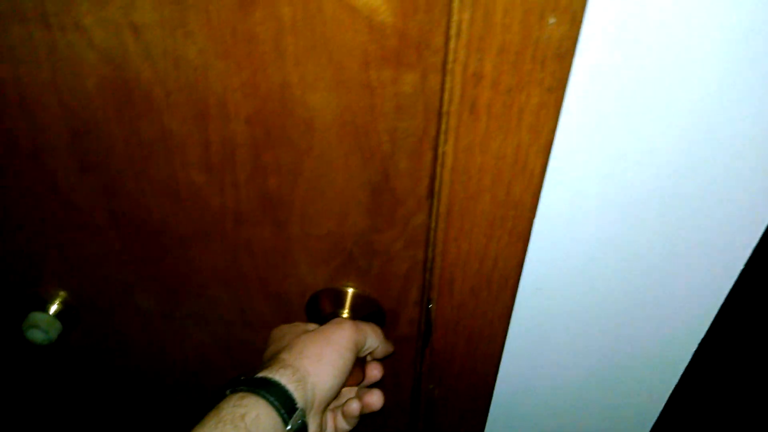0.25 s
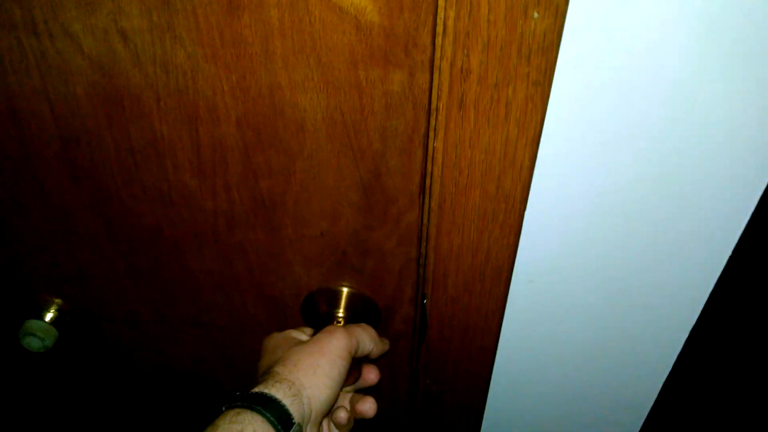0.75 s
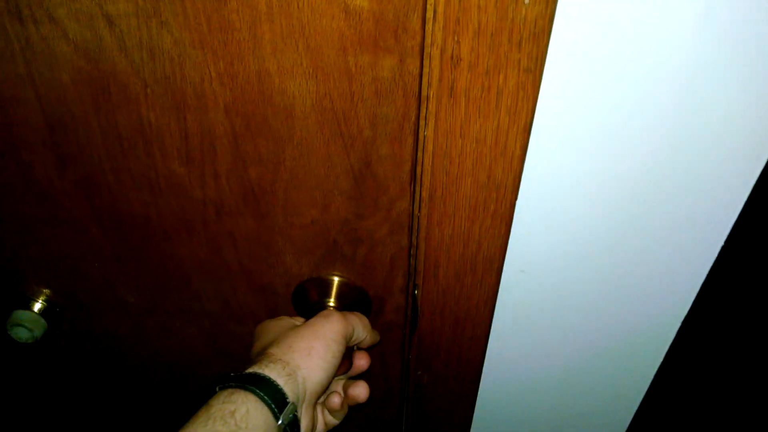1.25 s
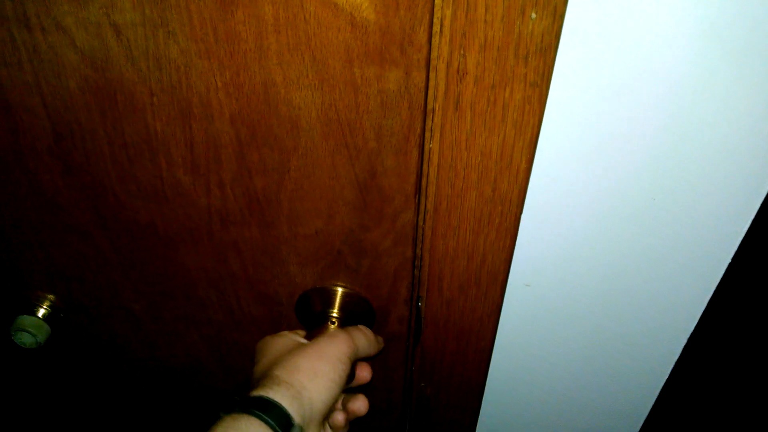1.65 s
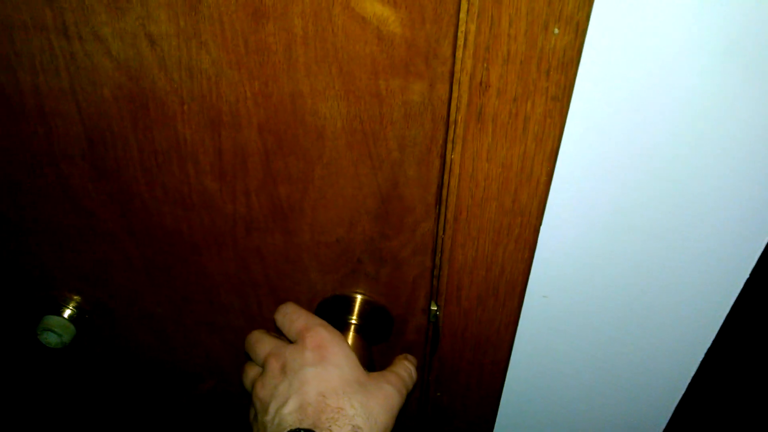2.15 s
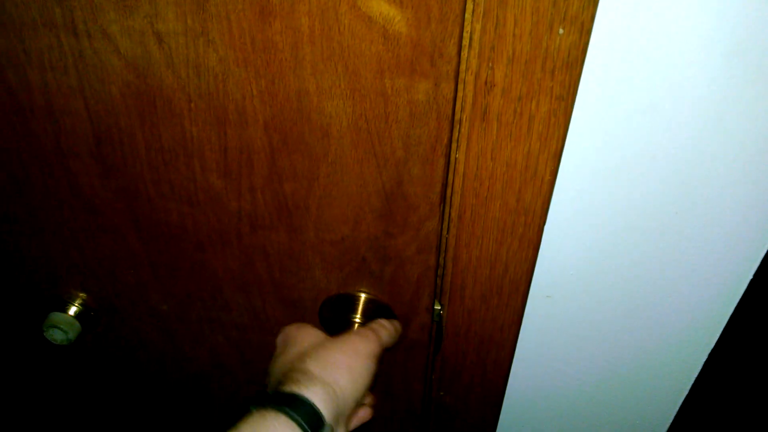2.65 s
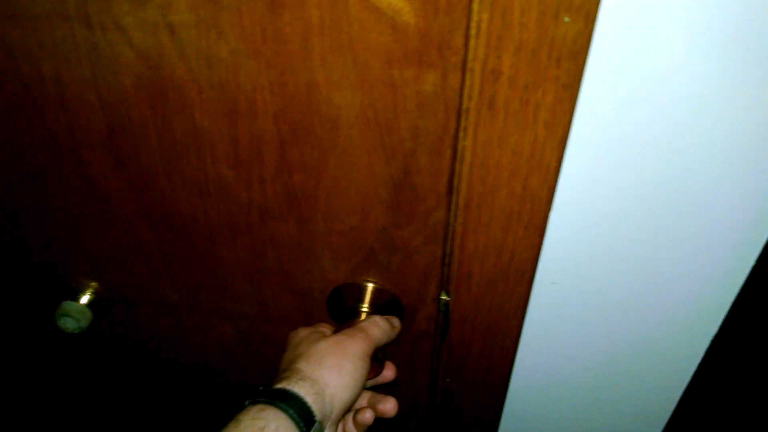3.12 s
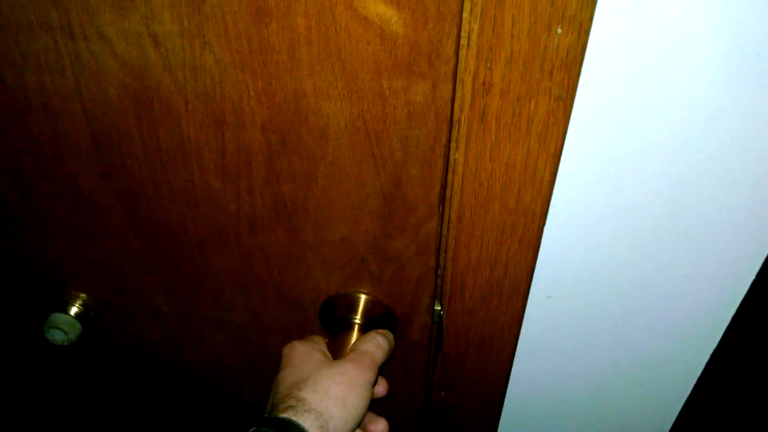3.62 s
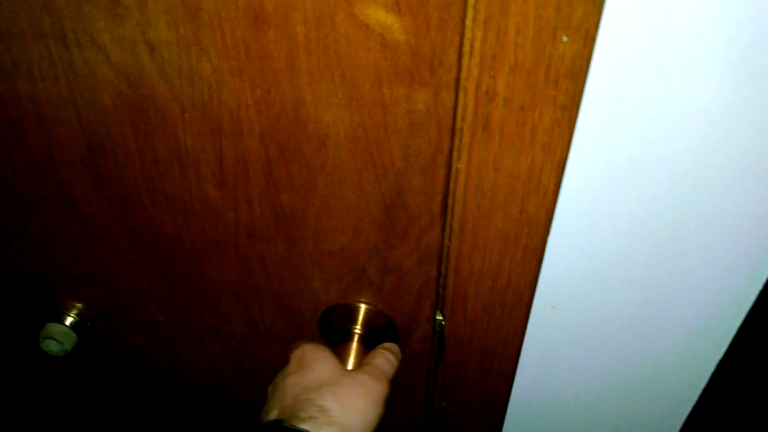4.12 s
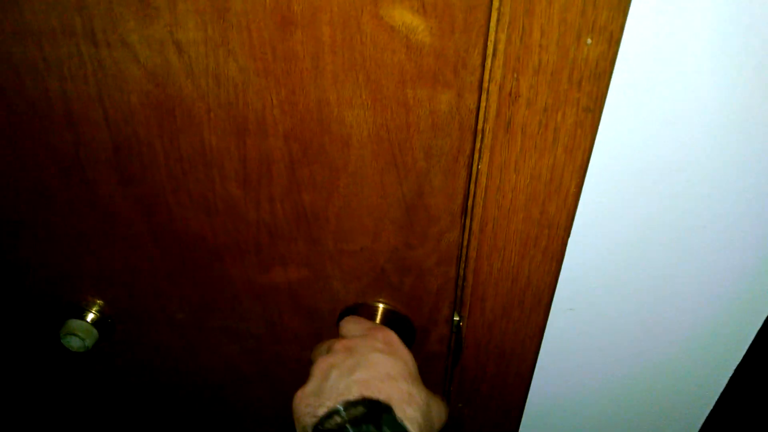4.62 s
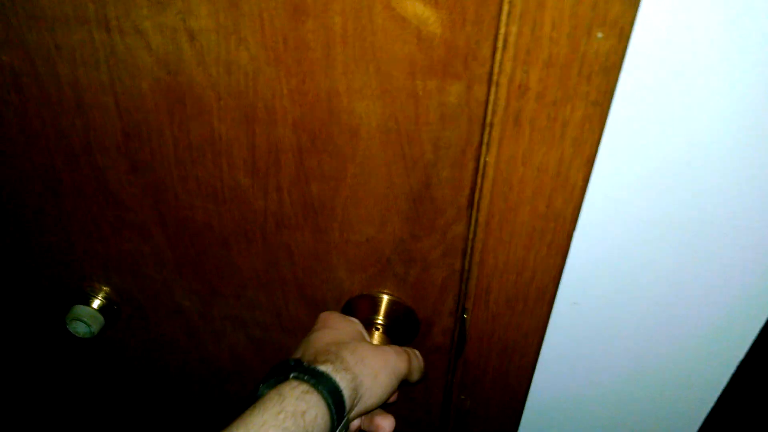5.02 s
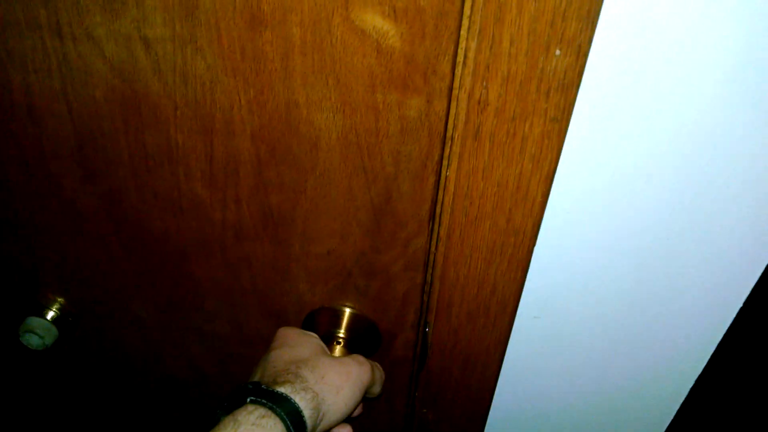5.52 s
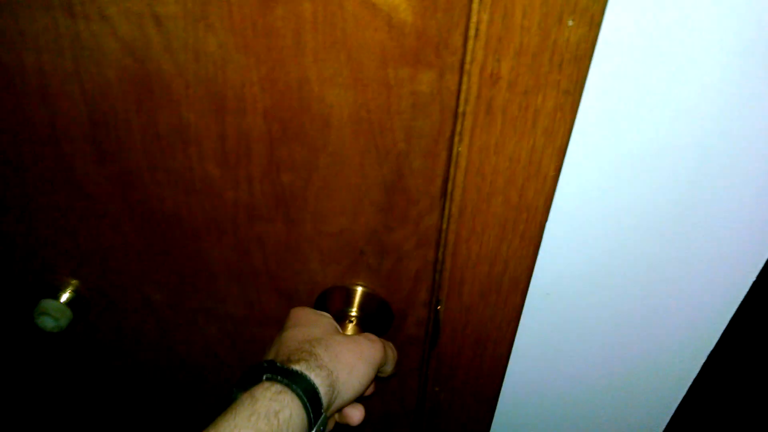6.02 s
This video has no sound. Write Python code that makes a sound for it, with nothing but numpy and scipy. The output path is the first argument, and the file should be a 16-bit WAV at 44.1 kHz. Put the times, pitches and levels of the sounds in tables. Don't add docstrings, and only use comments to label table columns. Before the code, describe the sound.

Throughout, a faint low building murmur, thin microphone hiss and soft handling rumble sit behind a close brass doorknob in a small room. At about 0.25-0.3 s the latch clicks with a springy rattle and a soft wooden bump. A light click follows at 0.8 s and a duller clack and thud at 1.3 s. At 1.9 s the bolt slams bright and sharp. After a quiet gap, the loudest metallic slam lands at 3.1 s with a short ring. From 3.5 to 3.8 s come firm knocks and snaps; from 4.1 to 4.9 s clicks, spring twangs and loose spindle chatter crowd together, with a tiny high ping near 4.5 s and another slam at 4.86 s. Then it is quieter, until a low jerk thumps door and lock at 5.5 s and a harder one hits at 6.12 s, with an immediate dull rebound and deep wooden thud.

```python
import sys
import numpy as np
from scipy import signal
from scipy.fft import rfft, irfft, next_fast_len
from scipy.io import wavfile
from scipy.ndimage import uniform_filter1d, map_coordinates

SR = 44100
rng = np.random.default_rng(int(sys.argv[2]) if len(sys.argv) > 2 else 0)


def bounce(signal):
    frames = np.transpose(np.atleast_2d(signal))
    limited = np.clip(frames, -1, 1)
    pcm = np.round(limited * 32767).astype(np.int16)
    wavfile.write(sys.argv[1], SR, pcm)


def voltage_ratio(decibels):
    exponent = np.asarray(decibels, float) / 20
    return 10 ** exponent


N = 276506
SPAN = 16384
LEAD = 300


def unit(x):
    return x / np.sqrt(np.mean(x ** 2) + 1e-20)


def along(points, hz):
    f, v = np.transpose(points)
    return np.interp(np.log(hz + 1), np.log(f + 1), v)


def wobble(rate_hz):
    return map_coordinates(rng.standard_normal(int(N * rate_hz / SR) + 4), [np.arange(N) * rate_hz / SR])


def filtered(x, response):
    m = next_fast_len(N + SR // 2)
    return irfft(rfft(x, m) * response(np.fft.rfftfreq(m, 1 / SR)), m)[..., :N]


def noise_pair(response):
    return filtered(rng.standard_normal((2, N)), response)


def jolts(rise_s, fall_s, gain_db):
    ages_s = np.clip(np.arange(N) / SR - np.array(THUDS)[:, :1], 0, None)
    sizes = [voltage_ratio(db + full_db + gain_db) for s, db, ring_hz, full_db in THUDS]
    return sizes @ ((1 - np.exp(-ages_s / rise_s)) * np.exp(-ages_s / fall_s))


# (time [s], effort [dB])
EFFORT = [(0.0, -1.5), (0.21, -1.5), (0.3, 1.5), (0.5, -4), (1.2, -4.5), (1.32, 2.5), (1.5, -2),
          (1.83, -2.5), (1.92, 10), (2.12, -1.5), (2.7, -2.4), (3.14, 2), (3.3, -0.9), (4.07, -0.5),
          (4.19, 3), (4.31, 1), (4.9, 2), (5.08, -2.5)]
# (frequency [Hz], density [dB per Hz])
MURMUR = [(60, -29), (110, -7.5), (160, 3), (300, -5.5), (550, -14), (800, -23.5), (1300, -29.5),
          (4000, -39.5)]
# (frequency [Hz], correlation [-1..1])
MURMUR_ALIKE = [(100, 1), (500, 0.9), (1500, 0.067)]
# (frequency [Hz], density [dB per Hz])
SWAY = [(12, 2.5), (30, 6), (45, 13), (70, -59)]
# (frequency [Hz], density [dB per Hz])
RUMBLE = [(35, -18), (55, -0.5), (78, 6.5), (105, -8.5), (200, -71)]


def house():
    effort_db = np.interp(np.arange(N) / SR, *np.transpose(EFFORT))

    def turn(hz):
        return np.arccos(np.clip(along(MURMUR_ALIKE, hz), -1, 1)) / 2

    a, b = noise_pair(lambda hz: voltage_ratio(along(MURMUR, hz)) * [np.cos(turn(hz)), np.sin(turn(hz))])
    murmur = voltage_ratio(-45 + effort_db + 0.7 * wobble(9.1)) * unit(np.array([a + b, a - b]))

    c, d = noise_pair(lambda hz: voltage_ratio(along(SWAY, hz)))
    swing = voltage_ratio(-52.5 + 1.3 * effort_db)
    swing = swing + jolts(rise_s=0.029, fall_s=0.071, gain_db=-0.5)
    sway = swing * voltage_ratio(2.6 * wobble(6)) * unit(np.array([0.68 * c + 0.16 * d, c - 0.1 * d]))

    e, g = noise_pair(lambda hz: voltage_ratio(along(RUMBLE, hz)))
    shake = voltage_ratio(-44.5) + jolts(rise_s=0.0083, fall_s=0.051, gain_db=4)
    rumble = shake * voltage_ratio(2.2 * wobble(7.6)) * unit(np.array([e + 0.16 * g, e - 0.2 * g]))
    return murmur + sway + rumble


# (time [s], level [dB], length [s], centre [Hz], width [Hz])
TICKS = [
    (0.071, 16.5, 0.0025, 7950, 6000),
    (.765, 9, .012, 12900, 3000),
    (.85, 0, 0.0079, 11900, 4000),
    (1.43, 0, 0.039, 14200, 900),
    (1.772, 9.5, 0.0095, 11000, 5000),
    (2.018, 10, 0.025, 13000, 1500),
    (2.77, 4, 0.0089, 12000, 4000),
    (3.43, 8, .05, 14200, 900),
    (5.77, 7, 0.014, 11900, 5000),
    (5.87, 2, 0.02, 13500, 1500),
]
# (frequency [Hz], density [dB per Hz])
HISS_LEFT = [(300, -20), (1500, 5), (4000, 2), (8000, -3), (12000, 2.5), (15300, 6), (15700, -34)]
# (frequency [Hz], density [dB per Hz])
HISS_RIGHT = [(300, 25), (1500, -0.5), (4000, -2), (8000, -16), (12000, -4.5), (14000, 5), (15300, 4.5),
              (15700, -26)]


def hiss():
    hz, t, z = signal.stft(rng.standard_normal((2, N)), SR, nperseg=256)
    gain = 1
    for s, db, length_s, mid_hz, wide_hz in TICKS:
        distance = ((t - s) / length_s) ** 2 + ((hz[:, None] - mid_hz) / wide_hz) ** 2
        gain = gain + voltage_ratio(db) * np.exp(-distance)
    noise = signal.istft(z * gain, SR, nperseg=256)[1][:, :N]
    return voltage_ratio(-63.5) * filtered(noise, lambda f: voltage_ratio([along(HISS_LEFT, f), along(HISS_RIGHT, f)]))


def modes(table, hz):
    luck_db = 1.5 * rng.standard_normal(len(table))
    z = 0
    for k, (centre_hz, width_hz, db) in enumerate(table):
        damping = 1j * hz * width_hz
        z = z + (-1) ** k * voltage_ratio(db + luck_db[k]) * damping / (centre_hz ** 2 - hz ** 2 + damping)
    return z / np.abs(irfft(z)).max()


def rattle(lasting_s, per_s, spread_db):
    t = np.arange(SPAN // 4) / SR
    when, size = rng.random(len(t)), rng.standard_normal(len(t))
    level_db = spread_db * np.abs(size) - 8.5 - 20 * t / lasting_s
    blows = (when < per_s / SR) * np.sign(size) * voltage_ratio(level_db)
    blows[0] = 1
    return np.pad(blows, (LEAD, 0))


# (frequency [Hz], t60 [s])
ROOM = [(100, 0.4), (260, 0.3), (700, 0.22), (1840, 0.27), (4850, 0.2), (12800, 0.13)]
# (frequency [Hz], level [dB])
WET = [(150, -2.5), (500, 2.5), (1500, -0.5), (2700, -12), (4000, -6), (6000, -1), (12000, -3)]
# (frequency [Hz], level [dB])
SHADOW = [(100, 0), (700, 0), (2000, -4), (5000, -4), (8000, -8), (14000, -14)]


def heard(bodies, blows, starts_s, wet_db, apart):
    half = SPAN // 2
    hz, t, z = signal.stft(rng.standard_normal((len(starts_s), 2, half)), SR, nperseg=256)
    decay = voltage_ratio(-60 * t / along(ROOM, hz)[:, None])
    tail = signal.istft(z * decay, SR, nperseg=256)[1][..., :half]
    tail *= 1 - np.exp(-np.arange(half) / (.003 * SR))
    tail = np.pad(tail / np.linalg.norm(tail, axis=2, keepdims=True), [(0, 0), (0, 0), (LEAD, 0)])

    f = np.fft.rfftfreq(SPAN, 1 / SR)
    a, b = np.moveaxis(rfft(tail, SPAN), 1, 0)
    turn = np.clip(apart(f), 0, 1) * np.pi / 4
    shared, differing = np.cos(turn) * a, np.sin(turn) * b
    wet = voltage_ratio(wet_db + along(WET, f)) * np.array([shared + differing, shared - differing])
    energy = np.linalg.norm(blows, axis=1, keepdims=True)
    shadow = np.array([voltage_ratio(along(SHADOW, f)), f ** 0])[:, None]
    pairs = irfft((rfft(blows, SPAN) + energy * wet) * bodies * shadow, SPAN)

    out = np.zeros((2, N + SPAN + LEAD))
    for k, s in enumerate(starts_s):
        out[:, round(s * SR):][:, :SPAN] += pairs[:, k]
    return out[:, LEAD:N + LEAD]


def contacts(rows, sizzle_db, rattle_s):
    return [(*row, sizzle_db, rattle_s) for row in rows]


# (time [s], level [dB], latch ring [Hz], brightness [dB])
SNAPS = [(0.222, -34, 860, -31), (0.298, -20.5, 1280, -38), (0.827, -34, 1220, -18),
         (1.227, -37.5, 1250, -31), (1.336, -31, 1250, -33), (1.9115, -27, 1120, -3),
         (1.927, -22.5, 1100, -20), (3.048, -30, 1450, -30), (3.56, -32.5, 1240, 3.5),
         (3.709, -35, 1450, -7), (3.74, -18, 1610, -1.5), (3.812, -16.5, 1100, -8),
         (4.196, -17.5, 1190, -1), (4.252, -23.5, 1330, -5), (4.259, -35, 1410, -31),
         (4.496, -21.5, 1030, 5.5), (4.564, -38, 1920, 13)]


def snaps():
    return contacts(SNAPS, sizzle_db=-0.5, rattle_s=0.016)


# (centre [Hz], width [Hz], level [dB])
LATCH = [(613, 840, -7), (1030, 315, -0.5), (1296, 567, -1.5), (1810, 527, 2), (2490, 600, 0.5)]
# (centre [Hz], width [Hz], level [dB])
BRASS = [(2600, 300, 12.5), (3450, 1530, 0), (4000, 1300, -11), (5000, 720, -10.5)]
# (centre [Hz], width [Hz], level [dB])
SIZZLE = [(6000, 1400, -15), (6900, 11000, -45), (9870, 4300, -0.5), (12160, 1250, 8.5), (14200, 6900, 2)]


def knob():
    f = np.fft.rfftfreq(SPAN, 1 / SR)

    def dull(edge_hz):
        return 1 / (1 + 1.4j * f / edge_hz - (f / edge_hz) ** 2)

    hits = sorted(snaps() + twangs() + knocks() + chatters() + clacks() + jerks())
    bodies, blows = [], []
    for s, db, ring_hz, bright_db, sizzle_db, rattle_s in hits:
        ring = 1 + 0.75 * 400j * f / (ring_hz ** 2 - f * f + 400j * f)
        plate = modes(LATCH, f) * dull(edge_hz=1950) * ring
        brass = voltage_ratio(bright_db) * modes(BRASS, f) * dull(edge_hz=5520) ** 2
        spring = voltage_ratio(bright_db + sizzle_db) * modes(SIZZLE, f)
        bodies.append(voltage_ratio(db - 3.5) * (1.118 * plate + brass + spring))
        blows.append(rattle(rattle_s, per_s=900, spread_db=5.5))
    starts_s = [hit[0] + .0004 for hit in hits]
    return heard(np.array(bodies), np.array(blows), starts_s, wet_db=0.5, apart=lambda hz: 0.58 + hz / 4000)


# (time [s], level [dB], leaf ring [Hz], fullness under 250 Hz [dB])
THUDS = [(0.255, -32, 582, -12), (0.297, -36.5, 483, -9), (0.83, -35.5, 540, -15), (1.226, -39.5, 357, -20),
         (1.271, -23.5, 260, -9), (1.335, -33, 525, -10), (1.895, -22.5, 424, -18), (3.008, -33, 383, -22),
         (3.111, -26.5, 492, -15.5), (3.371, -38, 240, -3.5), (3.525, -30, 254, -7.5),
         (3.559, -38.5, 500, -8), (3.716, -33, 370, -18), (3.81, -44.5, 524, 1), (3.988, -38.5, 493, -4.5),
         (4.084, -36.5, 560, -14), (4.132, -26, 268, -4), (4.194, -33, 248, -23), (4.313, -30, 544, -35),
         (4.495, -29.5, 505, -19), (4.595, -29.5, 480, -12), (4.804, -35, 420, -13),
         (4.855, -25.5, 475, -28), (5.179, -38, 336, -10.5), (5.499, -24, 393, -5), (5.782, -43, 300, -4),
         (6.075, -33.5, 245, -12), (6.124, -19, 198, -4.5), (6.152, -33.5, 250, -22)]
# (centre [Hz], width [Hz], level [dB])
LEAF = [(150.2, 18.6, 3.5), (230, 38, -5.5), (336, 65, 5), (422, 78, -2), (525, 28.7, -0.5),
        (637, 88, -1.5), (682, 515, -9)]


def door():
    f = np.fft.rfftfreq(SPAN, 1 / SR)
    bodies, blows = [], []
    for s, db, ring_hz, full_db in THUDS:
        full = voltage_ratio(full_db + 9.5) * modes(LEAF[:2], f)
        leaf = full + modes(LEAF[2:] + [(ring_hz, 50, 2)], f)
        bodies.append(voltage_ratio(db) * leaf / (1 + 1j * f / 1200))
        blows.append(rattle(0.042, per_s=230, spread_db=3.5))
    starts_s = [row[0] + .001 for row in THUDS]
    return heard(np.array(bodies), np.array(blows), starts_s, wet_db=-1, apart=lambda hz: .08 + hz / 3000)


# (time [s], level [dB], latch ring [Hz], brightness [dB])
TWANGS = [(0.2555, -26, 1435, -22), (0.265, -32, 1240, -11.5), (1.271, -20.5, 1120, -25),
          (1.901, -17, 1080, -11), (3.092, -52, 1180, 7), (3.342, -48, 1460, -15), (3.5, -30, 840, -8),
          (4.169, -24, 1260, -21), (4.294, -35.5, 1060, -11), (4.315, -20.5, 880, -11),
          (4.503, -25, 1570, 1), (5.18, -49, 880, -28), (5.454, -46, 855, -26), (5.855, -47, 1090, -24)]


def twangs():
    return contacts(TWANGS, sizzle_db=12.7, rattle_s=0.029)


# (time [s], level [dB], latch ring [Hz], brightness [dB])
KNOCKS = [
    (0.784, -49, 880, -6),
    (1.823, -46.5, 970, 1),
    (2.88, -40.5, 840, -10),
    (3.523, -25.5, 1130, -12),
    (4.488, -23.5, 1220, -9),
    (4.596, -32.5, 1110, 5),
    (4.733, -37.5, 1830, -2),
    (6.063, -35.5, 1450, -16),
]


def knocks():
    return contacts(KNOCKS, sizzle_db=-22.5, rattle_s=0.031)


# (time [s], level [dB], latch ring [Hz], brightness [dB])
CHATTERS = [(1.873, -49, 790, 4), (2.04, -39.5, 1250, -4), (2.975, -44, 860, -14),
            (3.008, -32.5, 860, -10.5), (3.728, -32.5, 1070, -1), (4.086, -39, 1230, -23),
            (4.114, -20, 1540, -9), (4.572, -25, 1130, 3.5), (4.632, -27.5, 1940, -3.5),
            (4.74, -33.5, 1170, -3), (4.805, -30.5, 1040, -19), (4.826, -28.5, 1200, -7.5)]


def chatters():
    return contacts(CHATTERS, sizzle_db=3, rattle_s=0.038)


# (time [s], level [dB], latch ring [Hz], brightness [dB])
CLACKS = [
    (1.8963, -15.5, 1910, 14),
    (3.1125, -14.5, 1130, 2),
    (4.856, -20.5, 1280, 4),
]


def clacks():
    return contacts(CLACKS, sizzle_db=-3, rattle_s=0.0069)


# (time [s], level [dB], frequency [Hz], t60 [s])
PINGS = [(1.898, -29, 394, 0.25), (3.115, -21.5, 1125, 0.06), (4.113, -31, 8760, 0.022),
         (4.252, -17.5, 1430, 0.028), (4.258, -24.5, 1387, 0.041), (4.499, -14.5, 11700, 0.034),
         (5.501, -28, 230, 0.2), (5.501, -30, 606, 0.065), (5.503, -37.5, 965, 0.17),
         (6.126, -28, 168, 0.19), (6.126, -28, 398, 0.11), (6.128, -32.5, 968, 0.12)]


def pings():
    t = np.arange(N) / SR
    out = np.zeros((2, N))
    for s, db, hz, t60_s in PINGS:
        age_s = np.clip(t - s, 0, 1)
        onset = 1 - np.exp(-age_s / 0.0039)
        tone = voltage_ratio(db - 60 * age_s / t60_s) * np.sin(2 * np.pi * hz * age_s) * onset
        out += tone * voltage_ratio([[along(SHADOW, hz)], [0]])
    return out


# (time [s], level [dB], latch ring [Hz], brightness [dB])
JERKS = [
    (5.5, -21.5, 905, -4.5),
    (6.124, -19.5, 1420, -1),
    (6.153, -18, 1280, -22),
]


def jerks():
    return contacts(JERKS, sizzle_db=-18, rattle_s=0.026)


def scene():
    return knob() + door() + pings() + house()


# (frequency [Hz], share [0..1])
CROSS = [(30, .3), (60, .9), (1300, .93), (2500, .97), (4000, .96), (6000, .86), (15000, .8)]


def widened(mics):
    def cross(hz):
        return np.clip(along(CROSS, hz), 0, 1) * np.exp(-2j * np.pi * hz / 2545)

    return (mics - filtered(mics[::-1], cross)) * voltage_ratio([[-.6], [.6]])


# (frequency [Hz], level [dB])
GRIT = [(300, -33), (2500, -27), (4000, -9), (5200, -2.5), (7000, 2), (15000, -2.5)]
# (frequency [Hz], slope [dB per dB])
COARSER = [(500, .15), (1300, .3), (2400, -.1), (4000, -.1), (5500, -.05), (8000, -.22), (15000, -.22)]


def grit(wide):
    hz, t, z = signal.stft(wide, SR, nperseg=256)
    patches = uniform_filter1d(rng.standard_normal(z.shape[1:]), size=5, axis=0)
    patches = unit(uniform_filter1d(patches, size=10, axis=1))
    loud_db = 10 * np.log10(np.mean(np.abs(z[:, 5:20]) ** 2, axis=(0, 1)) + 1e-20)
    over_db = np.clip(uniform_filter1d(loud_db, size=7) - np.median(loud_db), 0, 40)
    grit_db = along(GRIT, hz)[:, None] + along(COARSER, hz)[:, None] * over_db + 4 * patches
    scrambled = np.abs(z) * np.exp(2j * np.pi * rng.random(z.shape)) * voltage_ratio(grit_db)
    return signal.istft(scrambled, SR, nperseg=256)[1][:, :N]


def top_cut(x):
    return signal.sosfilt(signal.butter(12, 15920, fs=SR, output="sos"), x)


def record(dry):
    wide = widened(dry + hiss())
    banded = filtered(wide + grit(wide), lambda hz: 1 / np.sqrt(1 + (hz / 15620) ** 300))
    return top_cut(banded)


dry = scene()
out = record(dry)
bounce(out)
```